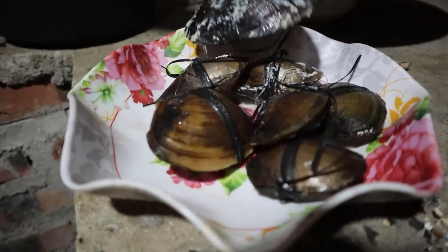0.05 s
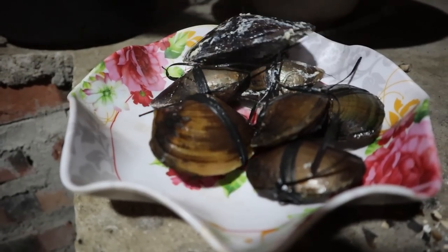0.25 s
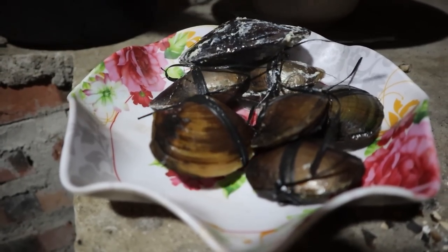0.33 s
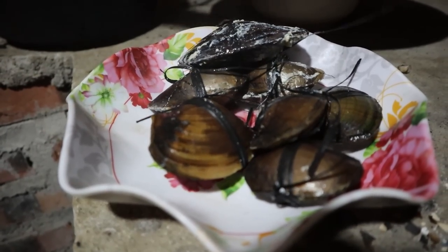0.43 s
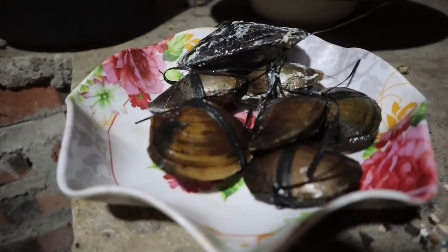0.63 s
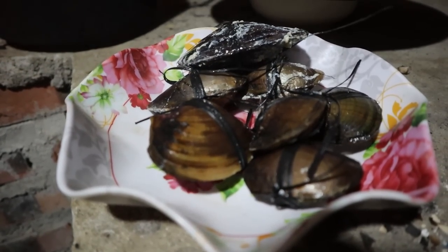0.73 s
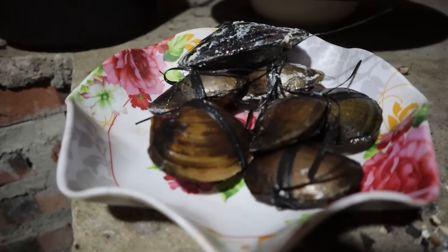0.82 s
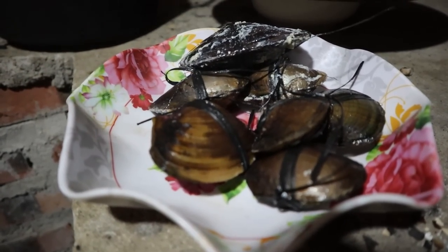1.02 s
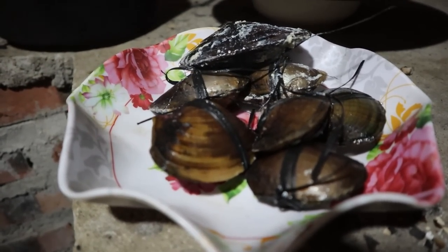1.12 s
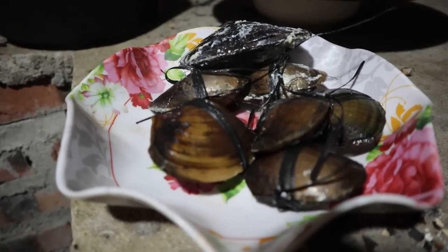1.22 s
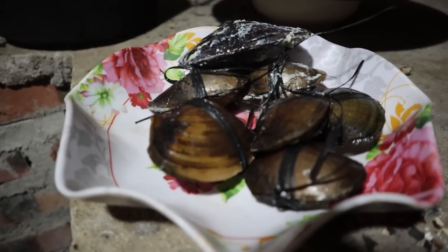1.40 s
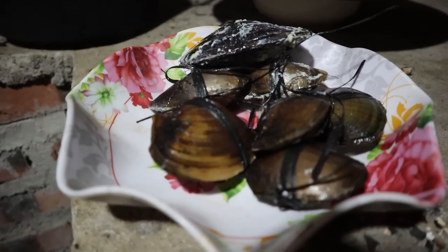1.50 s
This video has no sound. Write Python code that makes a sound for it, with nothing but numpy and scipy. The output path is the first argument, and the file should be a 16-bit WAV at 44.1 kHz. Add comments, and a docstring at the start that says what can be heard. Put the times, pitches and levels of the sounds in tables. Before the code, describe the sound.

A shell lands on a pile of shells in a dish with one sharp, close click at 0.2 seconds. The pile shifts with a dull bump and slight rub near 0.4 seconds, followed at once by a smaller click. Faint ticks come around 1.3 to 1.5 seconds. Throughout, several high insects chirp in quick pulses outdoors, over a distant insect chorus, quiet air and a faint, intermittent low hum.

```python
"""A shell is set on a pile of shells in a dish, close by: a sharp click as it rings, a dull bump as
the pile shifts and shakes the dish, a smaller click from the shell underneath, faint rubs and ticks.
Around it, at night in a brick yard, four insects chirp with runs of wing strokes at their own pitches
and tempos, smeared by wall echoes. Behind: a far chorus, quiet air and a soft, intermittent low hum."""
import sys
import numpy as np
from scipy import signal
from scipy.fft import rfft, irfft
from scipy.io import wavfile

SR = 44100
rng = np.random.default_rng(int(sys.argv[2]) if len(sys.argv) > 2 else 0)


def int16_out(signal):
    """Quantize to a 16-bit WAV file."""
    q = np.round(np.clip(np.atleast_2d(signal).T, -1, 1) * 32767)
    wavfile.write(sys.argv[1], SR, q.astype(np.int16))


N = 68355
T = np.arange(N) / SR


def from_db(db):
    """Decibels to gain."""
    return 10 ** (np.asarray(db) / 20)


def unit_rms(x):
    """Scale to rms 1."""
    return x / np.sqrt(np.mean(x ** 2) + 1e-20)


def at_hz(points, hz):
    """Read a table on a log-frequency axis."""
    table_hz, values = np.transpose(points)
    return np.interp(np.log(hz + 1e-6), np.log(table_hz), values)


def in_time(points):
    """Read a curve at every sample."""
    return np.interp(T, *np.transpose(points))


def noise(spectrum, correlation):
    """Coloured stereo noise, rms 1; left-right correlation is a number or a table."""
    hz = np.arange(N // 2 + 1) * SR / N
    alike = np.clip(at_hz(correlation, hz) if np.ndim(correlation) else correlation, -1, 1)
    mid, side = rfft(rng.standard_normal((2, N))) * from_db(at_hz(spectrum, hz))
    return unit_rms(irfft(np.sqrt(1 + alike) * mid + np.sqrt(1 - alike) * side * [[1], [-1]], N))


def drift(rate_hz):
    """Random wander through rate_hz unit-normal points a second."""
    return np.interp(T * rate_hz, np.arange(2000), rng.standard_normal(2000))


def swell(middle_s, length_s, edge_s=0.043):
    """Smooth rise, hold and fall."""
    ramp = np.clip((length_s / 2 - abs(T - middle_s)) / edge_s + .5, 0, 1)
    return np.sin(np.pi / 2 * ramp) ** 2


def bursts(rows):
    """Sudden onsets with exponential decays."""
    return sum(from_db(db) * (T >= s) * np.exp(-abs(T - s) / decay_s) for s, db, decay_s in rows)


def ring(force, hz, t60_s):
    """One damped mode; a unit impulse rings at height 1."""
    radius, angle = from_db(-60 / (t60_s * SR)), 2 * np.pi * hz / SR
    return signal.lfilter([.5, 0, -.5], [1, -2 * radius * np.cos(angle), radius ** 2], force + 1e-18)


def place(x, pan_db, lag_ms):
    """Stereo position: left louder by pan_db, right later by lag_ms."""
    late = np.interp(T - lag_ms / 1000, T, x)
    return np.array([x * from_db(pan_db / 2), late * from_db(-pan_db / 2)])


# air spectrum: f/Hz, level/dB
AIR_SPECTRUM = [(20, -12), (50, 0), (80, -7.5), (130, -8.5), (220, -6.5), (350, -10.5), (700, -12),
                (1500, -14.5), (2200, -17), (3300, -13.5), (6000, -25.5), (8200, -15), (10000, -26),
                (12500, -27), (15500, -63)]
# air envelope: t/s, level/dB
AIR_ENVELOPE = [(0, -44.5), (.3, -48.5), (.6, -48.5), (.95, -47.5), (1.3, -47), (1.55, -48)]
# air stereo image: f/Hz, correlation (clipped to +-1)
AIR_CORRELATION = [(60, 1), (300, 0.41), (1200, -0.43), (2500, -0.34), (5000, -0.81), (9000, -0.77),
                   (15000, -1.2)]
def night_air(flicker_db=1.6):
    """Quiet, wide noise whose level flickers."""
    return from_db(in_time(AIR_ENVELOPE) + flicker_db * drift(19.82)) * noise(AIR_SPECTRUM, AIR_CORRELATION)


# chorus spectrum: f/Hz, level/dB
CHORUS_SPECTRUM = [(3300, -22), (3750, -9), (4000, 1.5), (4170, -10), (4380, -15.5), (4620, -4.5),
                   (4950, -4), (5250, -12.5), (5600, -12.5), (6300, -26), (6600, -22), (6840, -9.5),
                   (7000, -15), (7170, -15.5), (7400, -36.5)]
# chorus envelope: t/s, level/dB
CHORUS_ENVELOPE = [(0, -47), (.3, -48), (.7, -47.5), (1.1, -45), (1.25, -46), (1.55, -44.5)]
def far_chorus():
    """Distant insects merge into bands of noise that swell and fade."""
    return from_db(in_time(CHORUS_ENVELOPE) + 2 * drift(25)) * noise(CHORUS_SPECTRUM, -0.066)


def yard_echoes(x, t60_s=0.3, echoes_per_s=1900):
    """Scattered reflections off walls and ground, at the level of the source."""
    t = T[:SR // 3]
    reflections = rng.standard_normal(len(t)) * (rng.random(len(t)) < echoes_per_s / SR)
    response = reflections * from_db(-60 * t / t60_s)
    return unit_rms(signal.fftconvolve(x, response)[:N]) * np.std(x)


def insect(chirps, hz, stroke_hz, jitter, sag_hz, waver_hz, wet_db, pan_db, lag_ms, step_hz=0):
    """A chirp is a run of wing strokes, each a short tone that sags in pitch as the wing slows."""
    middles_s, _, levels_db = np.transpose(chirps)
    envelopes = np.array([swell(s, length_s) for s, length_s, _ in chirps])
    from_middle_s = T - middles_s[envelopes.argmax(0)]
    step = .5 * np.tanh(from_middle_s / .012 + 1)  # pitch steps just before mid-chirp
    stroke_phase = np.cumsum(stroke_hz * (1 + jitter * drift(40))) / SR % 1
    pitch_hz = hz + sag_hz * (.5 - stroke_phase) + step_hz * step + waver_hz * drift(300)
    strokes = np.sin(np.pi * stroke_phase) ** 0.44 * from_db(2.4 * drift(90) + 2.2 * drift(30))
    tone = unit_rms(strokes * np.sin(2 * np.pi * np.cumsum(pitch_hz) / SR))
    song = from_db(levels_db) @ envelopes * tone
    echoes = place(yard_echoes(song), pan_db, lag_ms)
    diffuse = 0.59 * np.array([yard_echoes(song), yard_echoes(song)])
    mix = place(song, pan_db, lag_ms) + from_db(wet_db) * (echoes + diffuse)
    return mix / np.sqrt(1 + from_db(2 * wet_db))


# chirps of each insect: middle t/s, length/s, level/dB
NEAR_SONG = [(.015, .1, -37.5), (.21, 0.13, -41.5), (.415, 0.14, -41), (.595, 0.086, -35),
             (.768, 0.066, -35.5), (.945, 0.082, -38.5), (1.13, 0.12, -38), (1.315, 0.13, -37),
             (1.51, 0.11, -35.5)]
RASPY_SONG = [(.012, 0.057, -35.5), (.165, 0.092, -33.5), (.338, 0.11, -36.5), (.495, 0.045, -34.5),
              (.565, 0.12, -42.5), (.72, 0.13, -36), (.91, 0.1, -35), (1.088, 0.082, -36.5),
              (1.47, 0.098, -49)]
HIGH_SONG = [(.07, 0.061, -52), (.22, 0.079, -58), (.385, 0.082, -54), (.54, 0.072, -53),
             (.695, 0.093, -52), (.845, 0.087, -52.5), (.995, 0.089, -52.5), (1.145, 0.079, -53),
             (1.305, 0.093, -50), (1.455, 0.14, -53)]
LOW_SONG = [(.56, 0.041, -59), (.69, 0.14, -54.5), (.89, 0.12, -51.5), (1.065, 0.13, -47),
            (1.24, 0.13, -47.5), (1.35, 0.054, -47), (1.51, 0.12, -49)]
def insects():
    """Four singers; the raspy one sounds two neighbouring wing resonances."""
    near = insect(NEAR_SONG, hz=4115, stroke_hz=83, jitter=0.058, sag_hz=233.6, waver_hz=51,
                  wet_db=-2, pan_db=3, lag_ms=0.082)
    rasp_upper = insect(RASPY_SONG, hz=5179, stroke_hz=110, jitter=0.2, sag_hz=220, waver_hz=92.2,
                        wet_db=-3, pan_db=-1, lag_ms=0.067, step_hz=-33.5)
    rasp_lower = insect(RASPY_SONG, hz=4770, stroke_hz=210, jitter=0.16, sag_hz=300, waver_hz=203.4,
                        wet_db=-3, pan_db=2, lag_ms=0.082)
    high = insect(HIGH_SONG, hz=7028, stroke_hz=310, jitter=0.1, sag_hz=80, waver_hz=62,
                  wet_db=-5, pan_db=-1, lag_ms=0.028, step_hz=330.5)
    low = insect(LOW_SONG, hz=2616, stroke_hz=69, jitter=0.252, sag_hz=152, waver_hz=69.4,
                 wet_db=2, pan_db=-0.5, lag_ms=0.14)
    return near + from_db(-3) * rasp_upper + from_db(-6) * rasp_lower + high + low


# dry ticks, wet fizzes: t/s, level/dB, decay/s
TICK_BURSTS = [(0.0192, -30.5, 0.0023), (0.025, -46, 0.01), (.4494, -21, 0.00041), (1.3172, -22.5, 0.0013),
               (1.322, -40, 0.027), (1.3362, -33, 0.0023)]
FIZZ_BURSTS = [(.135, -56.5, 0.02), (1.318, -50, 0.013), (1.419, -46.5, 0.0059), (1.4245, -52.5, 0.0013),
               (1.4495, -38, 0.0023), (1.453, -55, .05)]
# their spectra: f/Hz, level/dB
TICK_SPECTRUM = [(300, -5), (900, 1), (1400, 6), (3500, 8.5), (5500, 6), (8000, -3), (12000, -1.5),
                 (15000, -23)]
FIZZ_SPECTRUM = [(2000, -32.5), (6000, -3), (9000, -5), (12500, 0.5), (15000, -19)]
def shell_ticks():
    """Tiny bright crackles and fizzes from the wet shells, left of centre."""
    crackle = bursts(TICK_BURSTS) * noise(TICK_SPECTRUM, 0.17)
    fizz = bursts(FIZZ_BURSTS) * from_db(2 * drift(440)) * noise(FIZZ_SPECTRUM, 0.2)
    return (crackle + fizz) * from_db([[1.5], [-1.5]])


# shell-on-shell slips: peak t/s, level/dB, rise/s, decay/s, centre f/Hz
SLIPS = [(0.021, -43, 0.0017, 0.0082, 443), (0.36, -40, 0.022, 0.0056, 990),
         (.3745, -33, 0.0011, 0.013, 730), (0.375, -29, 0.0031, 0.0068, 1920),
         (.519, -39, 0.0029, 0.0034, 470), (.95, -52, 0.024, 0.04, 1580)]
def shell_rubs():
    """Short grainy slips as the shells settle."""
    out = 0
    for s, db, rise_s, decay_s, hz in SLIPS:
        envelope = np.exp(np.minimum((T - s) / rise_s, (s - T) / decay_s))
        spectrum = [(hz / 6, -25), (hz / 1.28, -8), (hz, 0), (hz * 1.35, -9), (hz * 5, -50)]
        out = out + from_db(db + 1.6 * drift(700)) * envelope * noise(spectrum, .85)
    return out


# hum swells: middle t/s, length/s, level/dB, f/Hz
HUM_SWELLS = [(0.15, 0.11, -65.5, 157.9), (0.248, 0.044, -47.5, 155.4), (0.612, .1, -52, 168.6),
              (0.801, 0.069, -50, 167.2), (0.973, 0.015, -41, 169.5), (1.045, .06, -49.5, 165),
              (1.135, 0.059, -51.5, 238.7), (1.261, 0.053, -53, 165)]
def low_hum(waver_hz=4):
    """A soft, wavering tone that comes and goes."""
    out = 0
    for s, length_s, db, hz in HUM_SWELLS:
        phase = 2 * np.pi * np.cumsum(hz + waver_hz * drift(38.76)) / SR
        out = out + from_db(db) * swell(s, length_s) * unit_rms(np.sin(phase))
    return out


def struck_shell(blows, modes, lag_ms, low_cut_hz=253, contact_hz=8000):
    """Hard contacts ring short modes of alternating sign; a shell is too small to radiate bass."""
    out = 0
    for s, blow_db, pitch_ratio, pan_db in blows:
        impulse = from_db(blow_db) * (np.arange(N) == int(s * SR))
        ringing = sum((-1) ** k * from_db(db) * ring(impulse, hz * pitch_ratio, t60_s)
                      for k, (hz, db, t60_s) in enumerate(modes))
        out = out + place(ringing, pan_db, lag_ms)
    band = signal.butter(1, [low_cut_hz, contact_hz], "band", fs=SR, output="sos")
    return signal.sosfilt(band, out)


# blows on each shell: t/s, level/dB, pitch ratio, pan/dB
TOP_BLOWS = [(0.2097, 1, 0.99, -2), (0.2595, -36.5, 0.87, -4)]
LOWER_BLOWS = [(.4493, -14.5, 0.97, -4), (.4522, -24, 0.94, -9), (.4543, -22, .92, 4),
               (.4635, -28.5, .92, 0)]
# modes of each shell: f/Hz, level/dB, t60/s
TOP_MODES = [(403, -15.5, 0.015), (1100, -7, 0.0088), (1470, -7, 0.0064), (1996, -1, .011),
             (2025, -31, 0.046), (2200, -40, 0.035), (3550, -3.5, 0.0052), (4670, -1, 0.0026),
             (7000, -14, 0.0035), (11500, -28.5, 0.0014)]
LOWER_MODES = [(576, -21.5, 0.035), (1350, -12.5, 0.0067), (1980, -14.5, 0.035), (2300, -4.5, 0.016),
               (2730, -3, 0.0051), (5840, -6, 0.0078), (7900, -21, 0.0059)]
def shell_clicks():
    """The top shell lands and rocks once; the one underneath is tapped and rattles."""
    top = struck_shell(TOP_BLOWS, TOP_MODES, lag_ms=0.039)
    lower = struck_shell(LOWER_BLOWS, LOWER_MODES, lag_ms=0.062)
    return top + lower


# pushes of the pile: t/s, level/dB, contact/s
PILE_PUSHES = [(.2102, -6, 0.00096), (.3675, -11, 0.0012), (.3705, 1, 0.0014), (.4495, -9, 0.0016)]
# dish modes: f/Hz, level/dB, t60/s
DISH_MODES = [(92.6, -36.5, 0.38), (165, -35, 0.13), (237, -23, 0.04), (335, -19, 0.011),
              (470, -20.5, .018), (780, -36, 0.017)]
def dish_bumps():
    """The shifting pile rings the dish with soft half-sine pushes."""
    force = 0
    for s, db, contact_s in PILE_PUSHES:
        push = np.sin(np.pi * np.clip((T - s) / contact_s, 0, 1))
        force = force + from_db(db) * push / push.sum()
    ringing = sum(from_db(db) * ring(force, hz, t60_s) for hz, db, t60_s in DISH_MODES)
    return place(ringing, pan_db=-1, lag_ms=0)


# reflected tail: f/Hz, level/dB
SLAP_SPECTRUM = [(100, -3), (500, 1.5), (1100, 0.5), (2400, -5.5), (4000, -8), (10000, -14.5)]
def slap(x, level_db=-20.5, t60_s=0.13, delay_s=0.002):
    """Dish, ground and wall throw back a brief dull tail."""
    response = noise(SLAP_SPECTRUM, 0.44) * from_db(-60 * T / t60_s) * (T > delay_s)
    response /= np.sqrt(np.sum(response ** 2) / 2)
    return from_db(level_db) * signal.fftconvolve(x, response, axes=1)[:, :N]


def scene():
    """Shells in front, insects all around."""
    shells = shell_clicks() + dish_bumps() + shell_rubs() + shell_ticks()
    return shells + slap(shells) + insects() + far_chorus() + low_hum() + night_air()


def record(dry):
    """The loudest click clips; a steep low-pass cuts the top."""
    stop_db, stop_hz = 60, 16430
    low_pass = signal.cheby2(12, stop_db, stop_hz, fs=SR, output="sos")
    return signal.sosfilt(low_pass, np.clip(dry, -1, 1))


dry = scene()
out = record(dry)
int16_out(out)
```